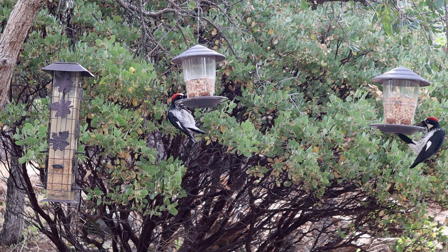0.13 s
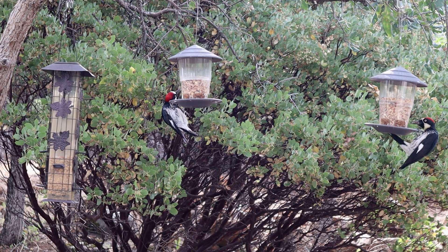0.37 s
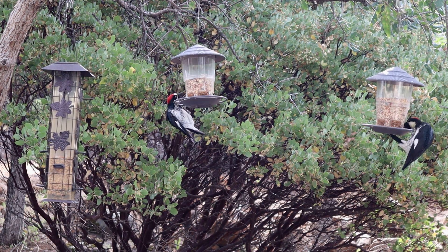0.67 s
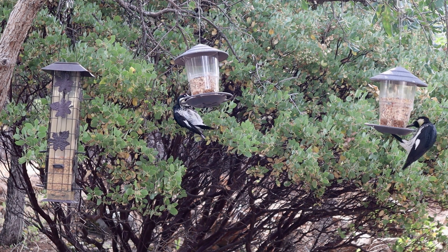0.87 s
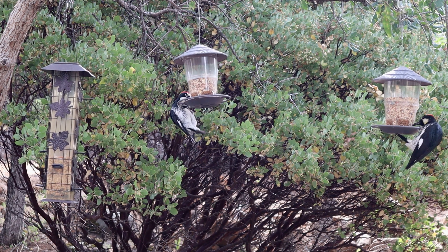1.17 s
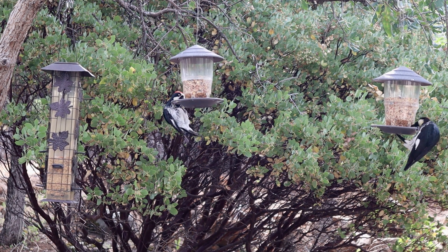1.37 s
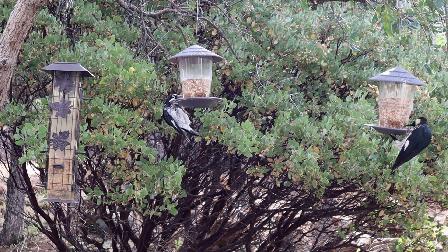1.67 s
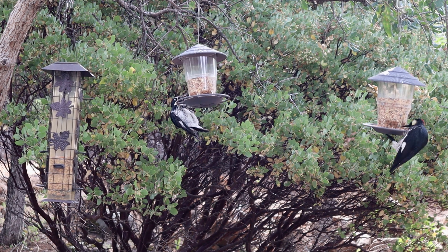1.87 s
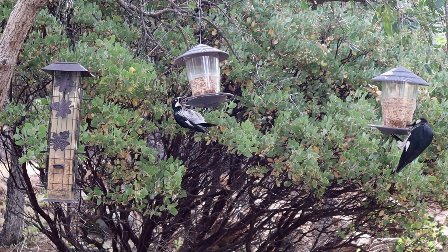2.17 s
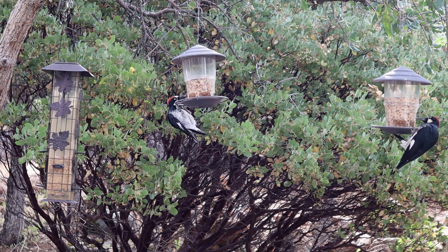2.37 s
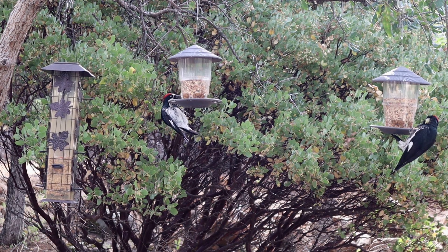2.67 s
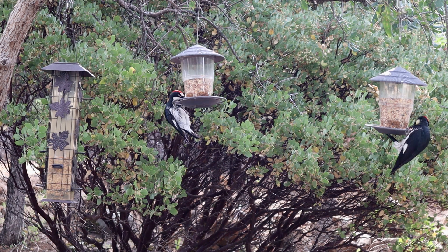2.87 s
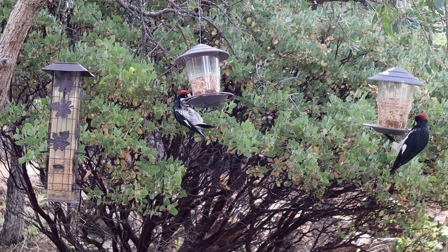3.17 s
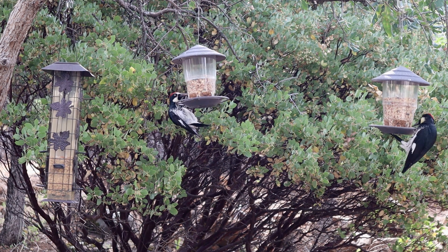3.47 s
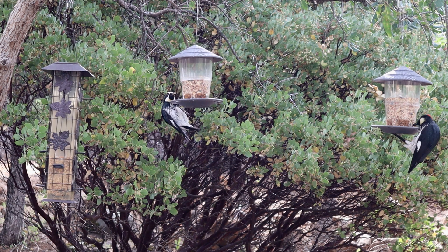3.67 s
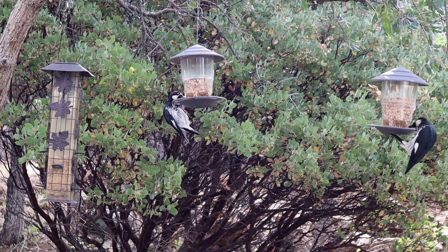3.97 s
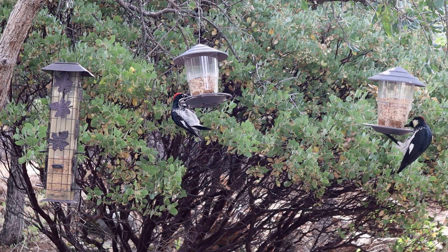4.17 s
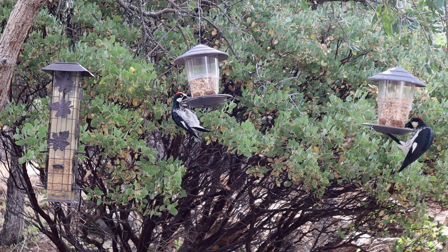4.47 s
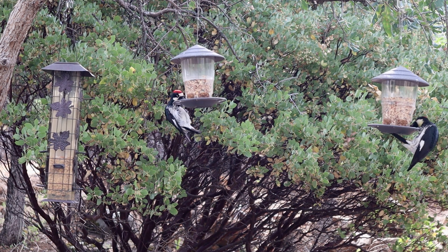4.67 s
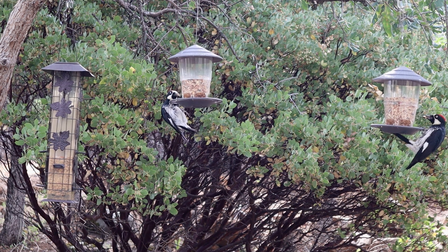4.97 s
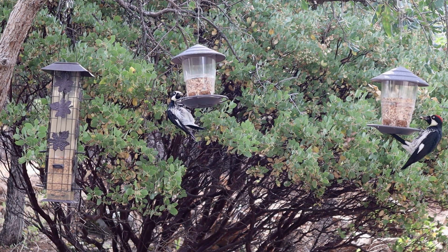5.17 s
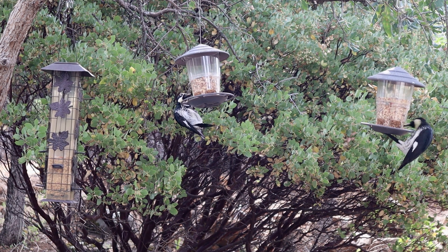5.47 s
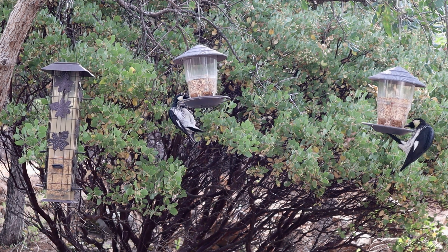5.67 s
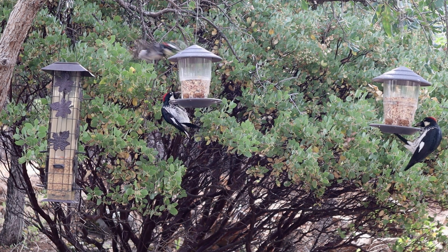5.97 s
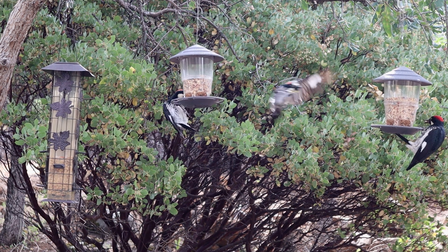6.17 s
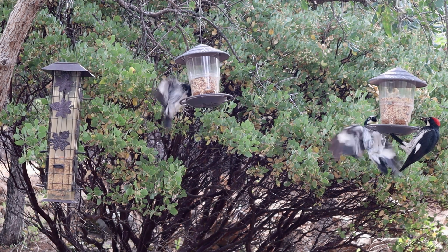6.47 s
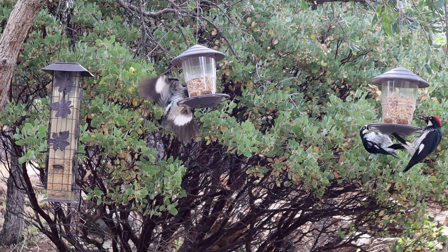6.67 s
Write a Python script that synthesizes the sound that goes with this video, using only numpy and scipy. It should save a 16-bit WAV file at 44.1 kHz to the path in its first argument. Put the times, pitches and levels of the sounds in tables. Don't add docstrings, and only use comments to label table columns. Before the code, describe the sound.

A steady soft outdoor hiss with a barely audible low hum runs throughout. At 0 s there is a faint wing brush and a weak rasp, then crisp beak ticks on a plastic feeder between 0.2 and 0.4 s. Thin, very high whistles glide from the leaves until about 1.3 s, with a soft arched chirp and flicked notes near 1.1-1.3 s. Then it is quiet: tiny ticks around 2.5-3 s, a faint peep at 3.5 s and a clear tap at 3.9 s. High whistles return from 5.2 s. At 5.4-5.5 s sharp knocks thud the tray, with a short steady whistle and wing stroke. Five loud, harsh, squeaky woodpecker calls follow from 5.6 to 6.35 s, about six per second, the first strongest, high whistles threaded between, trees echoing lightly. Wings flutter at 6.2 s; a small tick and feather rustle close at 6.6-6.85 s.

```python
import sys
import numpy as np
from scipy import signal
from scipy.io import wavfile
from scipy.ndimage import uniform_filter1d

SR = 44100
rng = np.random.default_rng(int(sys.argv[2]) if len(sys.argv) > 2 else 0)


def rack_gain(trim_db):
    fader = np.asarray(trim_db, float)
    return 10 ** (fader / 20)


def unload_audio(sound):
    columns = np.transpose(np.atleast_2d(sound))
    steps = np.round(np.clip(columns, -1, 1) * 32767)
    wavfile.write(sys.argv[1], SR, steps.astype(np.int16))


N = 300762
EDGE_HZ = 15770


# t/s, f/Hz, level/dB
STEADY_WHISTLE = [(5.443, 6100, -42), (5.455, 6020, -26), (5.47, 5960, -18.5), (5.49, 5940, -17),
                  (5.52, 5960, -18.5), (5.525, 6500, -17)]
# start t/s, length/s, level/dB, top f/Hz, end f/Hz
ARCHED_NOTES = [
    (1.129, .05, -27.5, 3440, 2800),
    (5.378, .052, -33, 3550, 2200),
]
# middle t/s, effort level/dB, effort lean/(dB/s), rising voice level/dB, falling voice level/dB
HARSH_CALLS = [
    (.085, -33, 61.5, -36, -32.5),
    (5.629, -11.5, -20, -20, -20.5),
    (5.802, -13.5, -7, -19, -16.5),
    (5.976, -15, 48, -18.5, -19),
    (6.153, -15.5, -16, -19, -17),
    (6.329, -18, 50, -22.5, -20),
]
# offset t/s, f/Hz, level/dB
RISING_VOICE = [(-.032, 1400, -14), (-.021, 1570, 0), (-.007, 1780, -1), (.004, 1890, -17)]
# offset t/s, f/Hz, level/dB
FALLING_VOICE = [(.006, 1730, -9.5), (.014, 1640, -1), (.034, 1532, -11.5), (.045, 1440, -8)]
# t/s, f/Hz, level/dB
MURMUR = [(5.485, 1300, -44), (5.505, 1280, -38), (5.55, 1280, -39), (5.572, 1200, -36)]
# offset t/s, peak level/dB re effort, start f/Hz, end f/Hz, length/s
CALL_GLIDES = [(-.058, -16, 1150, 1500, .022), (-.054, -11.5, 1600, 2150, 0.0197),
               (-.012, -1.5, 3440, 3200, 0.0069), (.009, -1.5, 2350, 1770, .007),
               (.008, -9, 2270, 2000, 0.012), (0.014, 3.5, 3360, 3300, 0.0044),
               (0.018, -7.5, 1850, 2010, .018)]
# offset t/s, level/dB re effort, start f/Hz, end f/Hz, length/s
SWOOP_GLIDE = (-.001, 8, 3600, 2450, .0095)
# t/s, peak level/dB, start
# f/Hz, end f/Hz, length/s
VOICE_CRACKS = [(0.054, -31.5, 4650, 4780, .02), (5.586, -20, 1816, 1660, .019),
                (5.597, -11, 3980, 4500, 0.016), (5.601, -17, 2610, 3065, 0.0155),
                (5.623, -8.5, 5830, 5340, 0.0095), (5.734, -23, 3300, 3600, .022),
                (5.736, -27, 5100, 5170, 0.026), (5.835, -37, 13200, 13250, .03),
                (5.913, -22, 3850, 3560, 0.016), (6.11, -25, 4300, 4544, 0.011),
                (6.116, -17.5, 1740, 1630, 0.012), (6.131, -13, 4580, 4600, 0.0044),
                (6.267, -22, 3980, 3870, 0.0065), (6.307, -12, 4830, 4750, 0.0076),
                (6.318, -6.5, 3480, 3150, .008), (6.328, -10, 3610, 2380, 0.0092),
                (5.965, -8.5, 3615, 3380, 0.012), (6.132, -24, 9320, 9500, .01),
                (6.34, -8, 3370, 3160, 0.0075), (0.065, -34, 3080, 3440, .012),
                (6.353, -15, 3310, 3770, 0.012)]
# t/s, peak level/dB, start f/Hz, end f/Hz, length/s
FAINT_PEEPS = [(.4, -32.5, 2263, 2230, 0.0188), (0.786, -37.5, 1037, 1000, 0.02),
               (.859, -37.5, 2980, 2900, .018), (0.881, -37, 1530, 1430, 0.0225),
               (0.897, -36, 2080, 2150, .013), (1.272, -37.5, 5650, 5540, .028),
               (3.528, -37, 4700, 4500, 0.0124), (5.157, -36, 3050, 3000, .008),
               (5.191, -31, 3050, 3050, .007), (5.407, -36.5, 1090, 1020, .015),
               (6.786, -38, 6400, 6400, .014)]


def callers():
    near = np.zeros(N)
    low_voices = [MURMUR]
    add(near, *voice(STEADY_WHISTLE, overtones_db=[-30], flutter_db=0.0, flutter_hz=90, jitter=0.0032))
    for row in ARCHED_NOTES:
        add(near, *voice(arch(*row), overtones_db=[-30], flutter_db=2.6, flutter_hz=120, jitter=0.004))
    for middle, effort_db, lean_db, rising_db, falling_db in HARSH_CALLS:
        low_voices.append(np.add(RISING_VOICE, (middle, 0, rising_db)))
        low_voices.append(np.add(FALLING_VOICE, (middle, 0, falling_db)))
        add(near, *rasp(throat_moves(middle, effort_db, lean_db)))
        for offset, db, *glide in CALL_GLIDES + [SWOOP_GLIDE]:
            add(near, *chirp(middle + offset, effort_db + db, *glide))
    for rows in low_voices:
        add(near, *voice(rows, overtones_db=[-7.5, -5, -6, -25], flutter_db=4.0, flutter_hz=189, jitter=0.038))
        add(near, *hoarse(rows))
    for row in VOICE_CRACKS + FAINT_PEEPS:
        add(near, *chirp(*row))
    return near


# offset t/s, level/dB
CALL_EFFORT = [(-.05, -30), (-.04, -9), (-.022, -3.5), (.005, 0.5), (.036, -2.5), (.047, -15), (0.067, -25)]


def throat_moves(middle, effort_db, lean_db):
    shut_hz, open_hz = 4447, 5470
    gape_at_s, gape_s = -0.0019, 0.0273
    at, shape_db = np.transpose(CALL_EFFORT)
    t = np.linspace(at[0], at[-1], num=60)
    db = np.interp(t, at, shape_db)
    gape = np.exp(-((t - gape_at_s) / gape_s) ** 2)
    upper_hz = shut_hz + (open_hz - shut_hz) * gape
    upper_db = 0.4 - 0.3 * db
    return np.c_[middle + t, effort_db + db + lean_db * t, upper_hz, upper_db]


# f/Hz (or factor on the upper resonance if below 10), width/Hz, air level/dB, squeaks/(1/s)
THROAT_RESONANCES = [(3348, 1110, -3, 380), (0.957, 1550, -2.5, 475), (1.348, 2200, -13.5, 400),
                     (8750, 1900, -16, 0), (11510, 1800, -22, 0), (15000, 1500, -33, 0)]


def rasp(rows):
    s, edge, (effort_db, upper_hz, upper_db) = unroll(rows)
    air = rng.standard_normal(len(edge)) * rack_gain(1.61 * wobble(len(edge), hz=220))
    throat = 0
    for k, (f, width, db, per_s) in enumerate(THROAT_RESONANCES):
        centre_hz = f * (upper_hz if f < 10 else np.ones(len(edge)))
        band = evened(resonate(air, centre_hz, width))
        band = band + rack_gain(-2.5) * squeaks(centre_hz, width, per_s)
        bright_db = 0.53 * (effort_db + 18.0) * (centre_hz > 8000)
        level = rack_gain(db + bright_db + (upper_db if k else 0))
        throat = throat + (-1) ** k * level * band
    return s, edge * rack_gain(effort_db - 2.5) * throat


def squeaks(centre_hz, width, per_s):
    out = np.zeros(len(centre_hz))
    draws = rng.random((80, 4))[:int(per_s * len(out) / SR)]
    for place, pitch, size, length in draws:
        hz = centre_hz[int(place * len(out))] + width * 1.33 * (pitch - 0.5)
        glide = 1 + 0.114 * np.tanh(6.2 * (0.45 - place))
        add(out, *chirp(place * len(out) / SR, -14 * size, hz, hz * glide, 0.005 + 0.011 * length))
    return evened(out)


def voice(rows, overtones_db, flutter_db, flutter_hz, jitter):
    s, edge, (hz, db) = unroll(rows)
    turns = 2 * np.pi * np.cumsum(hz * (1 + jitter * wobble(len(hz), hz=500))) / SR
    tone = np.sin(turns)
    for k, over_db in enumerate(overtones_db, 2):
        patchy = rack_gain(over_db + 1.5 * wobble(len(hz), hz=130)) * (k * hz < EDGE_HZ)
        tone = tone + patchy * np.sin(k * turns)
    flutter = flutter_db * np.minimum(wobble(len(hz), flutter_hz), 1)
    return s, np.sqrt(2) * edge * rack_gain(db + flutter) * tone


def hoarse(rows):
    s, edge, (hz, db) = unroll(rows)
    air = resonate(rng.standard_normal(len(hz)), 1.15 * hz, 350)
    return s, edge * rack_gain(db - 11.0) * evened(air)


def chirp(s, db, start_hz, end_hz, length):
    u = np.linspace(0, 1, int(length * SR))
    unsteady_db = 4.9 * np.sin(2 * np.pi * (rng.random() + 210 * length * u))
    level = np.sin(np.pi * u ** 0.99) * rack_gain(db + unsteady_db)
    hz = start_hz + (end_hz - start_hz) * u
    return s, level * np.sin(2 * np.pi * np.cumsum(hz) / SR)


def arch(start, length, db, top_hz, end_hz):
    top_at, rise, droop, end_db = 0.45, 0.04, 2.2, -7
    u = np.linspace(0, 1, num=24)
    before = np.maximum(1 - u / top_at, 0)
    after = np.maximum(u - top_at, 0) / (1 - top_at)
    hz = top_hz * (1 - rise * before ** 2) + (end_hz - top_hz) * after ** droop
    return np.c_[start + length * u, hz, db + end_db * u ** 2]


# t/s, f/Hz, level/dB
THIN_WHISTLES = [
    [(.44, 11100, -48), (.466, 11850, -40), (.48, 9250, -37), (.502, 8600, -29), (.553, 8520, -32),
     (.603, 8960, -31), (.63, 9280, -32), (.66, 10000, -34), (.705, 10620, -48)],
    [(.25, 11700, -50), (.276, 12120, -40), (.308, 12200, -34), (.335, 12150, -50)],
    [(.93, 11450, -48), (.955, 12000, -41), (1.0, 12000, -39), (1.014, 11250, -42), (1.035, 11900, -50)],
    [(1.216, 6000, -40), (1.222, 7780, -35), (1.252, 7760, -30), (1.265, 8250, -34), (1.28, 8300, -45)],
    [(5.525, 6900, -30), (5.534, 3950, -27), (5.55, 3830, -34), (5.585, 3800, -36)],
    [(5.885, 7900, -34), (5.893, 9600, -25), (5.92, 9150, -26), (5.958, 9050, -31), (6.0, 10000, -37)],
]
# start t/s, length/s, level/dB, f/Hz, place of the peak 0-1
HELD_NOTES = [
    (5.24, .05, -30, 10600, .4),
    (5.303, .024, -44, 10600, .5),
    (5.532, .093, -25, 10700, .62),
    (5.82, .066, -25, 6610, .4),
    (5.88, .07, -41, 6560, .2),
]
# start t/s, length/s, level/dB, top f/Hz, rest f/Hz
FLICKED_NOTES = [
    (1.178, .035, -28, 4750, 4040),
    (1.301, .048, -33, 9600, 7620),
    (5.559, .028, -33, 9350, 7500),
]
# f/Hz, t60/s
LEAF_DECAY = [(1000, .09), (4000, .1), (12000, .11)]


def whistlers():
    far = np.zeros(N)
    notes = THIN_WHISTLES + [held(*row) for row in HELD_NOTES] + [flick(*row) for row in FLICKED_NOTES]
    for rows in notes:
        add(far, *voice(rows, overtones_db=[-30], flutter_db=3.4, flutter_hz=100, jitter=0.004))
    return far + rack_gain(-4) * echo(far, LEAF_DECAY)


def held(start, length, db, hz, peak):
    ends_db = db - 16
    return [(start, hz, ends_db), (start + peak * length, hz, db), (start + length, hz, ends_db)]


def flick(start, length, db, top_hz, rest_hz):
    leap_s, leap_from, start_db, end_db = 0.006, 0.68, -6, -10
    t = np.linspace(0, length, num=40)
    leap = np.maximum(1 - t / leap_s, 0)
    sag = np.clip((t - leap_s) / (length - leap_s), 0, 1)
    hz = rest_hz + (top_hz - rest_hz) * (1 - sag) ** 1.6 - top_hz * (1 - leap_from) * leap
    return np.c_[start + t, hz, db + start_db * leap + end_db * sag ** 6]


# t/s, peak level/dB, low edge f/Hz, high edge f/Hz, share of tray ring
BEAK_TICKS = [(.198, -24, 4040, 12100, 0.1), (0.2295, -17.5, 5000, 14000, .1),
              (.31, -27, 12000, 15500, .05), (0.4218, -19, 3500, 9000, 0.14),
              (2.455, -25, 8000, 15000, .05), (2.766, -24, 4000, 8000, .05), (2.77, -24, 7500, 15000, .05),
              (2.831, -28, 5000, 10000, .05), (2.94, -28, 4500, 7000, .05), (2.966, -26, 4500, 7000, .05),
              (1.22, -30, 5500, 7500, .05), (3.9107, -13, 1400, 11000, 0.35),
              (5.205, -34, 9000, 13100, .05), (5.433, -12, 3200, 9400, 0.17),
              (5.4925, -18.5, 3000, 11800, .2), (5.502, -10.5, 1200, 9000, 0.27),
              (5.512, -21, 500, 8060, .3), (6.635, -25.5, 1500, 4030, 0.35)]
# t/s, level/dB, f/Hz, t60/s
TRAY_THUDS = [
    (5.432, -35, 240, .03),
    (5.502, -26, 210, .05),
    (5.5, -32, 120, .08),
    (5.512, -31, 620, .02),
]


def pecks():
    out = np.zeros(N)
    t = np.arange(3000) / SR
    for row in BEAK_TICKS:
        add(out, *tick(*row))
    for s, db, hz, t60 in TRAY_THUDS:
        body = evened(resonate(rng.standard_normal(len(t)), hz, 0.66 * hz))
        add(out, s, rack_gain(db - 60 * t / t60) * body)
    return out


# f/Hz, level/dB, t60/s
TRAY_MODES = [(2190, -6, 0.013), (3600, 1, 0.014), (5860, 1, 0.0064)]


def tick(s, db, low_hz, high_hz, ring):
    t = np.arange(600) / SR
    band = signal.butter(2, [low_hz, min(high_hz, EDGE_HZ)], "band", fs=SR)
    strike = rng.standard_normal(600) + 3.5 * (t == 0)
    snap = signal.lfilter(*band, strike * rack_gain(-60 * t / 0.0082))
    tray = sum(rack_gain(d - 60 * t / t60) * np.sin(2 * np.pi * hz * t) for hz, d, t60 in TRAY_MODES)
    return s, rack_gain(db) * (snap / abs(snap).max() + ring * tray)


# start t/s, rise/s, hold/s, fall/s, level/dB
WING_STROKES = [
    (0.0, .001, 0.051, .01, -40),
    (.14, 0.0346, 0.043, .06, -41),
    (1.07, 0.0342, .03, .004, -41.5),
    (5.17, 0.064, .015, .055, -44),
    (5.473, 0.083, 0.022, .02, -28.5),
    (6.19, 0.018, 0.078, 0.021, -30),
    (6.672, .025, .14, 0.0086, -35.5),
]
# f/Hz, level/(dB per Hz)
FEATHER_COLOUR = [(700, -30), (1150, -11), (1550, 0), (2150, -1), (2800, -9), (3600, -6), (6500, -12),
                  (12000, -26)]


def rustle():
    level = np.zeros(N)
    for start, rise, hold, fall, db in WING_STROKES:
        times = start + np.cumsum([0, rise, hold, fall])
        stroke = np.c_[times, db - 10 * np.array([1, 0, 0, 1])]
        s, edge, (stroke_db,) = unroll(stroke)
        add(level, s, edge * rack_gain(stroke_db))
    return level * noise(FEATHER_COLOUR, patch_db=4.0) * rack_gain(1.34 * wobble(N, hz=60))


# f/Hz, level/(dB per Hz)
HISS_COLOUR = [(20, 7), (55, -12.5), (130, -7.5), (300, -5), (700, -0.5), (1050, -4.5), (1700, -13.5),
               (2300, -2), (2950, -10), (3500, -6), (4050, -8.5), (4650, -7), (6500, -14.5), (15500, -19.5)]
# f/Hz, rms level/dB
MACHINE_TONES = [(403.7, -61)]


def floor():
    hum_hz = 110 + 2.63 * wobble(N, hz=4.8)
    hum = rack_gain(-55.5 + 2.5 * wobble(N, hz=5)) * np.sin(2 * np.pi * np.cumsum(hum_hz) / SR)
    for hz, db in MACHINE_TONES:
        level = np.sqrt(2) * rack_gain(db + 3 * wobble(N, hz=3))
        drifting_hz = hz + 1.5 * wobble(N, hz=4)
        hum = hum + level * np.sin(2 * np.pi * np.cumsum(drifting_hz) / SR)
    return rack_gain(-36.5) * noise(HISS_COLOUR, patch_db=0.92) + hum


def noise(colour, patch_db):
    frames, hz = N // 256 + 5, np.fft.rfftfreq(1024, 1 / SR)
    a, b, patches = rng.standard_normal((frames, 513, 3)).T
    patches = uniform_filter1d(patches, size=12, axis=0)
    patches = evened(uniform_filter1d(patches, size=12, axis=1))
    z = (a + 1j * b) * rack_gain(read(colour, hz)[:, None] + patch_db * patches)
    return evened(signal.istft(z, nperseg=1024, noverlap=768)[1][:N])


# f/Hz, t60/s
TREE_DECAY = [(1000, 0.24), (4000, 0.38), (12000, 0.45)]


def trees(sound):
    return rack_gain(-13.5) * echo(sound, TREE_DECAY)


def echo(x, decays):
    at = np.arange(160, 22000, 20)
    taps = np.zeros(22050)
    taps[at + rng.integers(0, 20, len(at))] = rng.choice([-1., 1.], len(at))
    hz, t, z = signal.stft(taps, SR, nperseg=256)
    tail = signal.istft(z * rack_gain(-60 * t / read(decays, hz)[:, None]), SR, nperseg=256)[1]
    return signal.fftconvolve(x, tail / np.linalg.norm(tail))[:N]


def resonate(x, hz, width):
    turn = np.exp(2j * np.pi * np.cumsum(hz * np.ones(len(x))) / SR)
    r = np.exp(-np.pi * width / SR)
    return 2 * (turn * signal.lfilter([(1 - r) ** 2], [1, -2 * r, r * r], x / turn)).real


def wobble(count, hz):
    size = max(int(SR / hz / 2), 1)
    drift = uniform_filter1d(rng.standard_normal(count + 4000), size)
    return evened(uniform_filter1d(drift, size))[:count]


def unroll(rows):
    s, *columns = np.transpose(rows)
    t = np.arange(s[0], s[-1], 1 / SR)
    edge = np.clip(np.minimum(t - s[0], s[-1] - t) / 0.0012, 0, 1)
    return s[0], edge, [np.interp(t, s, c) for c in columns]


def evened(x):
    return x / np.sqrt(np.mean(x ** 2) + 1e-20)


def read(points, hz):
    f, value = np.transpose(points)
    return np.interp(np.log(hz + 1), np.log(f + 1), value)


def add(mix, s, sound):
    part = mix[round(s * SR):][:len(sound)]
    part += sound[:len(part)]


def scene():
    close = callers() + pecks()
    far = whistlers()
    return (close + far + trees(close + 0.94 * far) + rustle() + floor())[None]


def band_limit(x):
    return signal.sosfilt(signal.butter(12, 16570, fs=SR, output="sos"), x)


def record(dry):
    thin = signal.lfilter(*signal.butter(3, 44, "high", fs=SR), dry)
    limited = 1.253 * np.tanh(thin / 1.248)
    lowpass = signal.firwin(1023, EDGE_HZ, window=("kaiser", 10), fs=SR)
    band = signal.oaconvolve(limited, lowpass[None], "same")
    return band_limit(np.clip(band + 0.002, -1, 1))


dry = scene()
out = record(dry)
unload_audio(out)
```